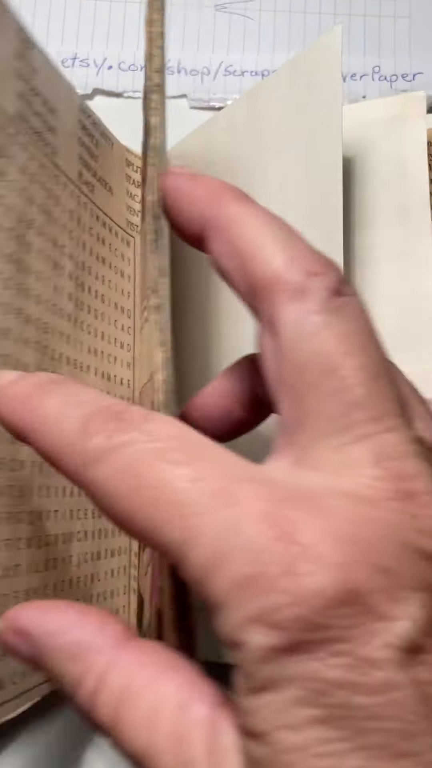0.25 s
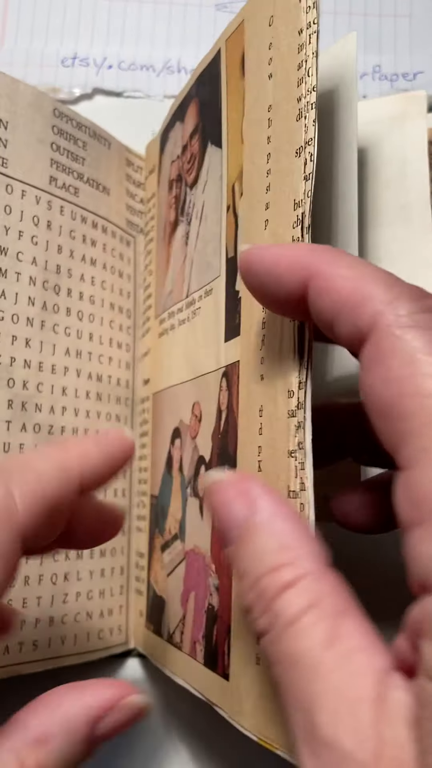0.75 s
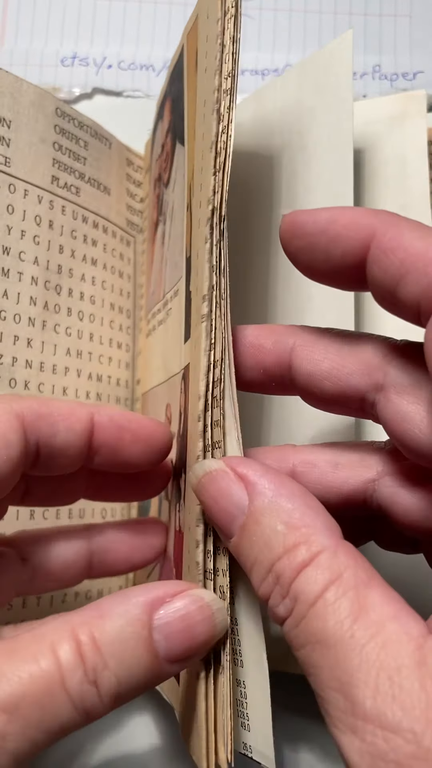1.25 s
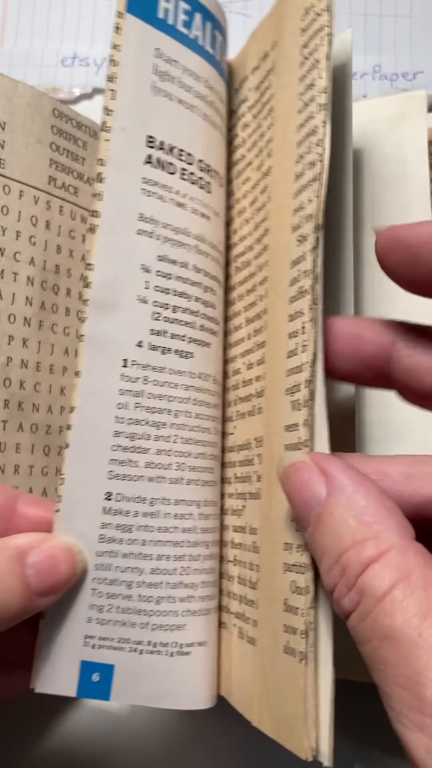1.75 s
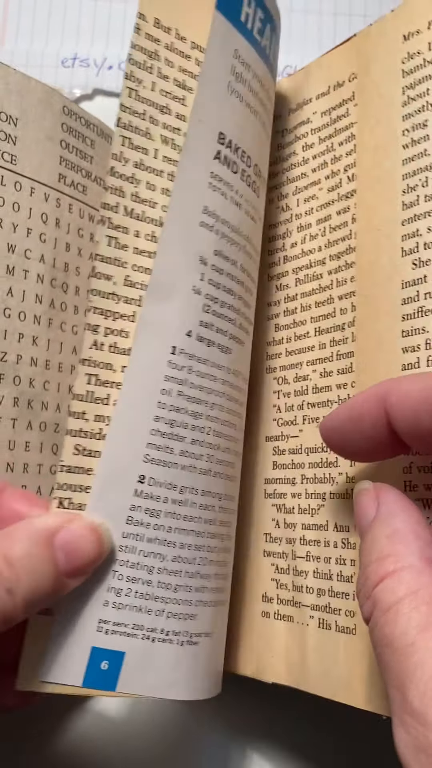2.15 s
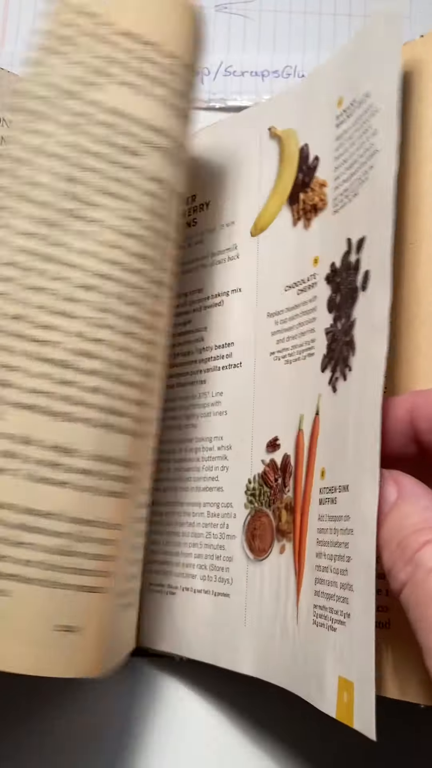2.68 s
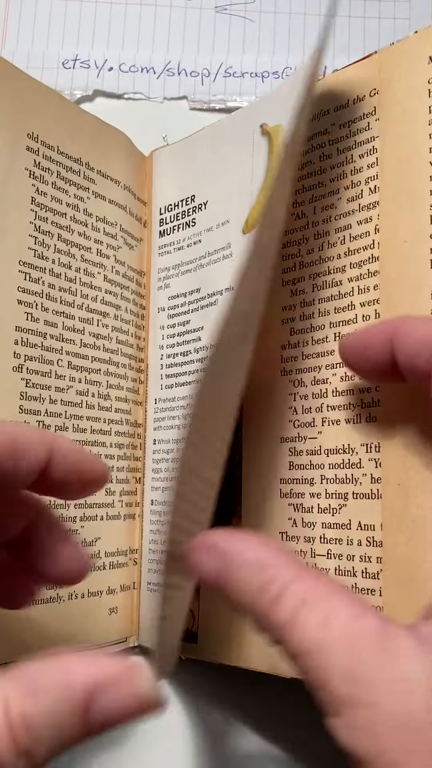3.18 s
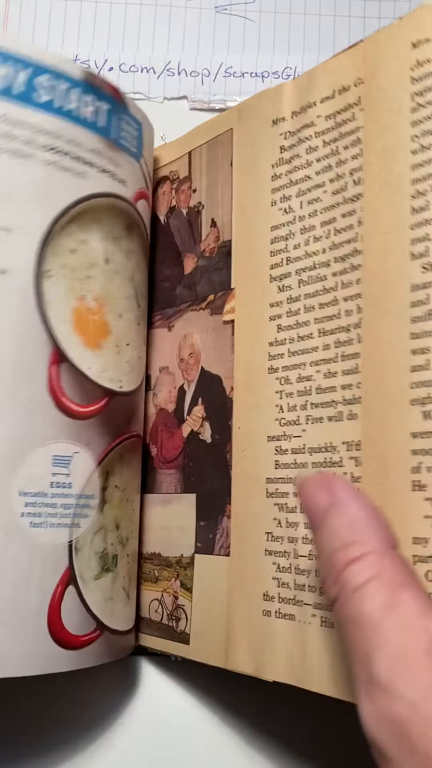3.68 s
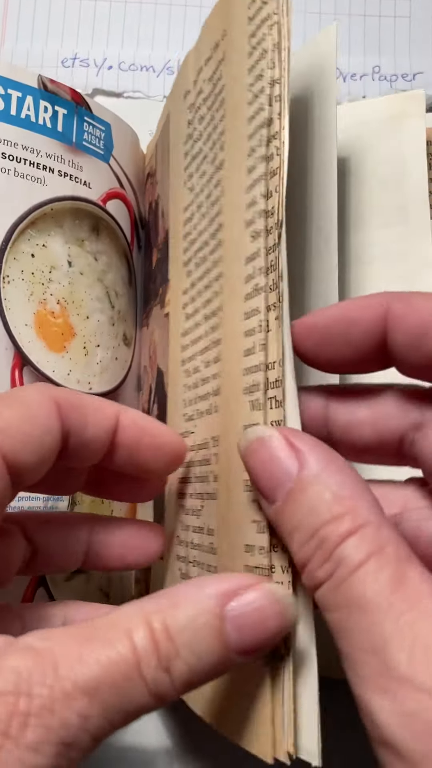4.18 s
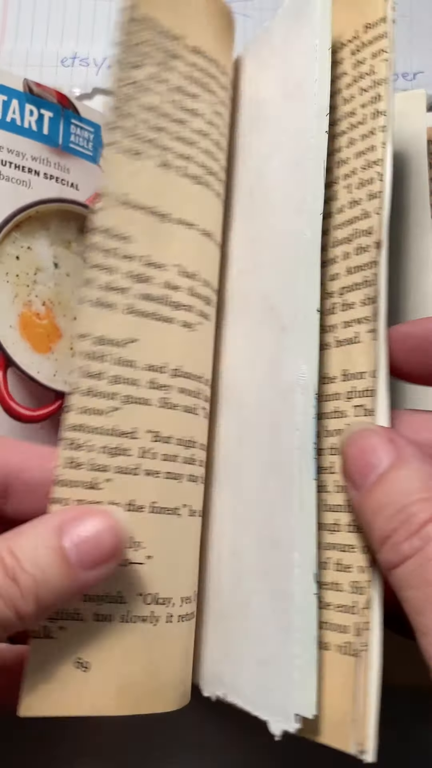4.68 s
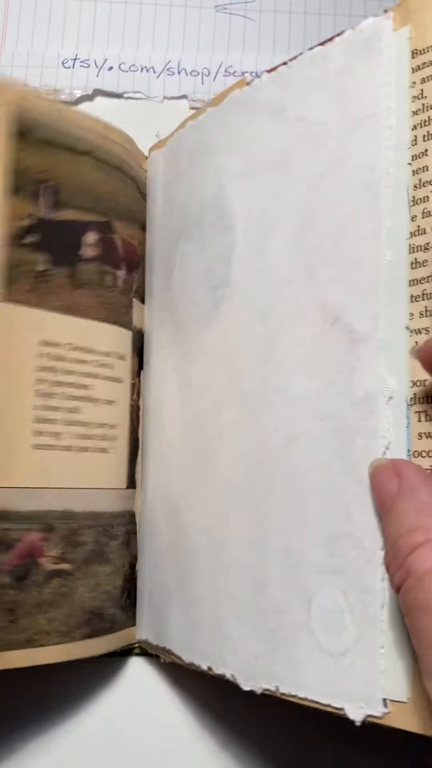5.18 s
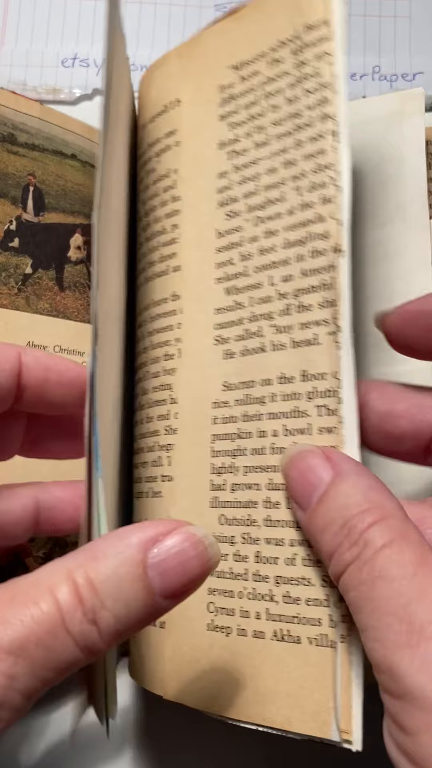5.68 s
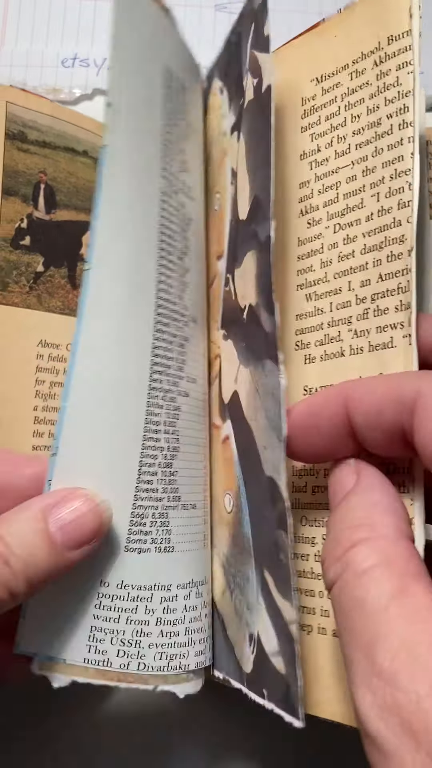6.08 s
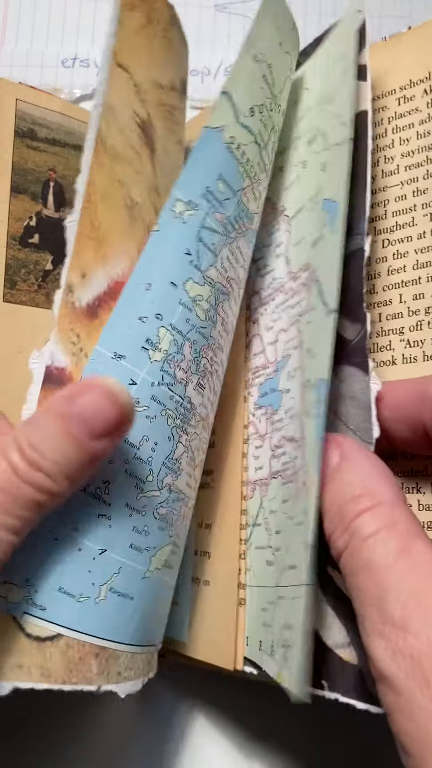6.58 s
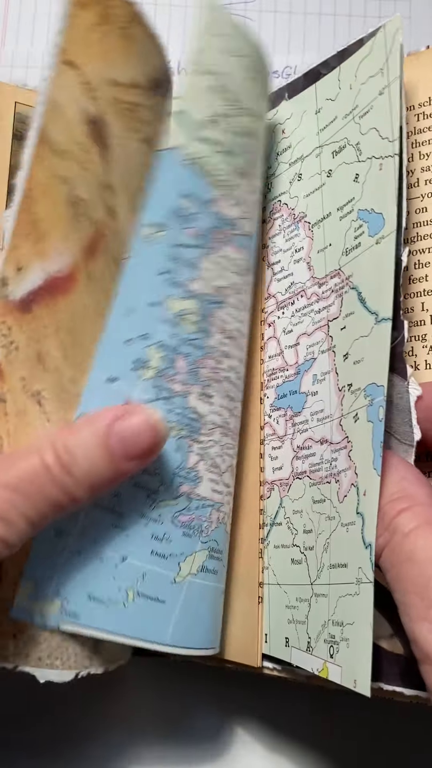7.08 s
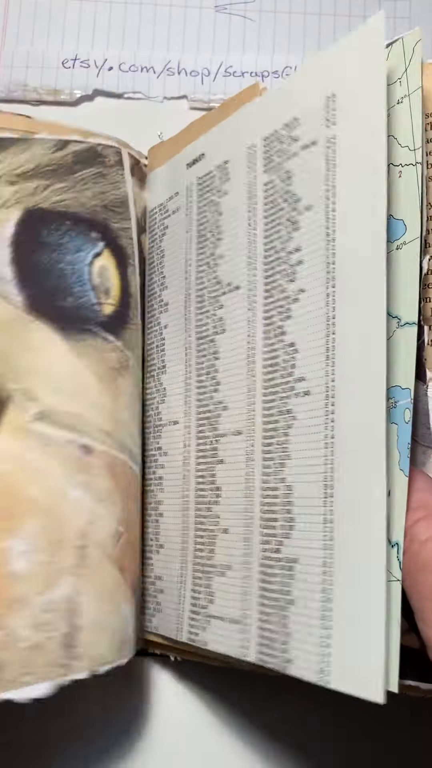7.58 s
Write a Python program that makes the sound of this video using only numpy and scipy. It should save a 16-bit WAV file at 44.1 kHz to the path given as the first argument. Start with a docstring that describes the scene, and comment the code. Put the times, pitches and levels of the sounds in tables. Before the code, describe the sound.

Close up in a quiet room, hands leaf through a small booklet of stiff mixed papers. The start is mostly faint finger brushing with small crease ticks; then pages flip with crisp crackling slaps and dull puffs of air. Later, two long grainy drags of a curled sheet dominate, ending in a cluster of crackly landings. Close stereo microphone, low soft room air.

```python
"""Fingers brush and slide over stiff mixed paper, close up in a quiet room, as hands leaf through a booklet.
Sliding is clumped hiss with sparse ticks, filtered by the sheet's edge, body and flap; creases snap in
short bursts; pages slap shut with a roll of crackle and a knock of air that falls in pitch.
Close echoes, a sparse room tail and low, faintly hissing air surround the book; a brief hum sags in pitch.
Two microphone ports hear it all with delay and shading between them."""
import sys
import numpy as np
from scipy import signal
from scipy.fft import rfft, irfft, next_fast_len
from scipy.io import wavfile
from scipy.ndimage import uniform_filter1d

SR = 44100
rng = np.random.default_rng(int(sys.argv[2]) if len(sys.argv) > 2 else 0)


def volts(x):
    """Linear amplitude factor 10**(x/20) for a level x in dB, scalar or array-like."""
    e = np.asarray(x, float) / 20
    return 10 ** e


def unload_audio(sound):
    """Save the sound as a 16-bit wav file, at the path given as the first command line argument."""
    columns = np.transpose(np.atleast_2d(sound))
    # keep every value between -1 and 1, then stretch to whole-number steps
    steps = np.round(np.clip(columns, -1, 1) * 32767)
    wavfile.write(sys.argv[1], SR, steps.astype(np.int16))


N = 346185
TIME_S = np.arange(N) / SR
FILTER_HZ = np.fft.rfftfreq(4096, 1 / SR)


def evened(x):
    """Scales to rms 1."""
    return x / np.sqrt(np.mean(x ** 2) + 1e-20)


def drift(x, samples):
    """Moving average of noise, rms 1: a slow random wander."""
    return evened(uniform_filter1d(x, samples))


def read(points, hz, order=1):
    """One column of a table on a log-frequency axis."""
    table = np.transpose(points)
    return np.interp(np.log(hz + 1), np.log(table[0] + 1), table[order])


def over_time(points):
    """Every column after the first, interpolated along time."""
    s, *columns = np.transpose(points)
    return [np.interp(TIME_S, s, column) for column in columns]


def causal(gain):
    """Minimum-phase response of energy 1 for a gain curve."""
    log_gain = np.log(np.maximum(np.r_[gain, gain[-2:0:-1]], 1e-5))
    taps = np.fft.ifft(np.exp(np.conj(signal.hilbert(log_gain)))).real[:1024]
    return taps / np.linalg.norm(taps)


def coloured(x, gain):
    """Filters both ports by a gain curve given on FILTER_HZ."""
    return signal.oaconvolve(x, causal(gain)[None], axes=1)[:, :N]


def resonate(x, hz, width_hz):
    """Shifts the curve hz down to zero, smooths, and shifts back: a moving resonance."""
    turn = np.exp(2j * np.pi * np.cumsum(hz) / SR)
    r = np.exp(-np.pi * width_hz / SR)
    return 2 * (turn * signal.lfilter([1 - r], [1, -r], x / turn)).real


def spread(apart_db):
    """Noise from a wide sheet: at lower pitches the two ports hear partly other parts of it."""
    # What only one port hears. Each row: frequency in Hz, level in dB re the common part before apart_db.
    apart = [(100, -2), (600, -5), (2000, -4), (4000, -7), (5200, -18), (9000, -14), (16000, -10)]
    common, *own = rng.standard_normal((3, N))
    own_gain = volts(read(apart, np.fft.rfftfreq(N, 1 / SR)) + apart_db)
    return common + irfft(rfft(own) * own_gain, N)


def bend():
    """Bending the sheet in hand moves its main resonance (Hz) and its low flap (dB re body)."""
    # The sheet in hand. Each row: time in seconds, main resonance in Hz, low flap in dB re body before trim.
    bends = [(0.0, 1420, 9), (0.239, 2300, -2), (0.33, 1530, 3.5), (0.46, 2050, 6), (1.621, 1740, 3),
             (2.23, 1180, 8), (2.8, 1290, 6.5), (2.93, 1530, 4), (3.24, 1900, -1.5), (3.34, 1530, 1.5),
             (3.62, 1680, 6.5), (4.02, 2150, 3), (4.2, 1360, 4.5), (4.26, 2660, -6), (4.35, 1330, 4.5),
             (4.46, 2220, -2), (4.61, 1410, 0), (5.03, 1564, 9.5), (5.25, 1650, 2), (5.46, 1300, 14.5),
             (5.49, 2550, 2), (5.55, 2470, -4), (5.61, 1630, 0.5), (5.86, 1900, 3.5), (5.9, 1550, -10),
             (6.19, 1226, 4), (6.27, 1300, 5.5), (6.31, 1800, 2.5), (6.41, 1870, -2.5), (6.56, 1950, 5),
             (6.6, 1400, 18), (6.68, 1500, -0.5), (6.87, 1290, 1), (6.96, 2030, 3), (7.07, 1980, 1),
             (7.12, 1430, 7.5), (7.34, 1310, 7.5), (7.56, 1660, 2), (7.65, 1760, 5), (7.85, 1730, 4.5)]
    return over_time(bends)


def paper(drive, edge_gain, body_gain, flap_gain, body_hz, sharp=0.94, width_hz=320, dull_hz=9000):
    """One excitation sounds through the sheet's edge, its body resonances and its slow flap."""
    # Edge colour. Each row: frequency in Hz, relative level in dB.
    edge = [(1800, -46.5), (3000, -12), (3900, -4), (5000, 5.5), (6500, 4), (8600, 6), (10500, 3),
            (12500, -1.5), (15500, -1)]
    # Fixed sheet resonances. Each row: frequency in Hz, half-width in Hz, relative level in dB.
    modes = [(962, 315, 11), (1300, 3900, -13), (1940, 256, -5), (2665, 230, -6.5), (4040, 640, -3)]
    # Flap colour. Each row: frequency in Hz, relative level in dB.
    flap = [(60, -53), (130, -17.5), (250, -6.5), (420, -2.5), (700, 5.5), (950, 8.5), (1400, -21)]
    # Second resonance of the bent sheet, below the main one on a tightly curled page.
    # Each row: time in seconds, ratio to the main resonance, share of the main resonance (1 = equal).
    second = [(0, 2.03, 0.11), (1.68, 1.3, .2), (1.72, 0.67, 0.44), (1.8, 1.4, .8), (2.02, 1.4, 0.32),
              (6.8, 2.5, 0.6), (6.9, 0.71, 0.86), (7.07, 0.61, 1.2), (7.14, 2.6, 0.22)]
    hz = FILTER_HZ
    ring = sum(volts(db) / (1 + ((hz - f) / w) ** 2) for f, w, db in modes)
    ring = ring * (hz / (hz + 600)) ** 4 / (1 + (hz / dull_hz) ** 4)
    ratio, share = over_time(second)
    body = drive * body_gain
    main = resonate(body, body_hz, width_hz)
    other = resonate(body, ratio * body_hz, 0.5 * width_hz)
    bent = 0.5 * body + sharp * (main + share * other)
    return (coloured(drive * edge_gain, volts(read(edge, hz))) + coloured(bent, ring)
            + coloured(drive * flap_gain, volts(read(flap, hz))))


def contact():
    """Edge hiss and sheet body in dB: touch, drags and rubs add up in power."""
    # Fingers resting and creeping on the pages.
    # Each row: time in seconds, edge hiss in dB before trim, sheet body in dB re hiss before trim.
    touch = [(0, -54.5, -14), (.12, -60.5, -5.5), (.3, -71, -25), (.42, -85.5, -9), (.58, -69, -18),
             (.66, -79.5, -13), (.9, -68, -17), (1.17, -90, -2.5), (1.3, -70.5, -14), (1.45, -79, -3),
             (1.56, -68.5, 7.5), (1.7, -76.5, 11), (1.8, -74.5, -26), (2.0, -79.5, -2), (2.22, -65.5, 5.5),
             (2.36, -88, -9.5), (2.6, -72.5, -7.5), (2.85, -59.5, -4.5), (3.04, -79.5, -1.5),
             (3.14, -85, 12), (3.36, -80.5, 4), (3.4, -57, -12), (3.5, -63, 7.5), (3.56, -104, -5),
             (3.69, -71, -21), (3.77, -91, -20), (3.95, -70.5, -15), (4.2, -101, -2.5), (4.35, -67, -2.5),
             (4.42, -76.5, -6), (4.5, -62.5, -8.5), (4.9, -74.5, 4.5), (5.06, -76.5, -12),
             (5.34, -69.5, -1.5), (5.7, -83, -3.5), (5.87, -69, 0.5), (6.07, -60, -3), (6.78, -100, -21),
             (7.44, -62.5, 5.5), (7.78, -66, -4), (7.85, -80, 12)]
    # Two long drags of a curled page, one list each.
    # Each row: time in seconds, edge hiss in dB before trim, sheet body in dB re hiss before trim.
    drags = [
        [(6.12, -87, -17), (6.132, -68, 1), (6.186, -46, -0.5), (6.244, -49.5, 3), (6.334, -45, 0.5),
         (6.354, -50, 4), (6.364, -44, -5.5), (6.4, -42, -1.5), (6.52, -54, 1.5), (6.54, -44.5, 2),
         (6.56, -45, -5.5), (6.567, -58.5, 4), (6.6, -69, -5)],
        [(6.78, -59.5, -4), (6.84, -54, -2.5), (6.88, -46, 0.5), (6.96, -42.5, 0), (6.996, -48.5, 6),
         (7.062, -41, -1), (7.108, -50.5, -2), (7.145, -43, 5), (7.16, -46, -4.5), (7.272, -50.5, -4.5),
         (7.338, -44, -1), (7.362, -50.5, -9), (7.37, -59, 0), (7.4, -64, -14)],
    ]
    # Quick rubs of sheet on sheet. Each row: loudest time in seconds, rise in seconds, fall in seconds,
    # edge hiss in dB before trim, sheet body in dB re hiss before trim.
    rubs = [(.04, 0.028, 0.047, -67, 8.5), (0.293, 0.039, 0.052, -65, 2),
            (0.702, 0.018, 0.0072, -55.5, -36), (.73, 0.066, 0.23, -67.5, -13),
            (0.967, 0.042, 0.0096, -57, -17), (1.07, 0.015, 0.034, -69.5, -29),
            (1.214, 0.021, 0.06, -58.5, -21.5), (1.40, 0.056, 0.043, -64, -2),
            (1.519, 0.018, 0.014, -47, -12.5), (1.575, 0.02, 0.059, -50.5, -12),
            (1.614, 0.082, 0.018, -50.5, -5), (1.68, 0.076, 0.017, -73.5, 10.5),
            (1.716, 0.011, 0.05, -57.5, 4.5), (1.745, 0.041, 0.011, -60, 6.5), (1.92, 0.12, 0.022, -76, 5),
            (2.097, 0.036, 0.026, -69, 10), (2.122, 0.026, 0.053, -33.5, -9.5),
            (2.172, 0.03, 0.019, -38.5, -9.5), (2.254, 0.012, 0.01, -49, 6.5),
            (2.278, 0.044, 0.051, -66.5, 2.5), (2.47, 0.077, 0.083, -62.5, 0.5),
            (2.762, 0.041, 0.07, -50.5, -9.5), (2.918, 0.022, 0.021, -56, 1),
            (3.181, 0.059, 0.071, -59, -2), (3.237, 0.04, 0.039, -50, 3.5), (3.42, 0.032, 0.11, -63, -6),
            (3.503, 0.074, 0.011, -54, -7), (3.619, 0.049, 0.26, -59.5, 0),
            (3.846, 0.045, 0.069, -50.5, 0.5), (4.172, 0.055, 0.042, -71.5, -1),
            (4.25, 0.023, 0.063, -62, -16), (4.635, 0.052, 0.032, -52, -6.5), (4.81, 0.048, 0.054, -50, -1),
            (4.856, 0.09, 0.011, -60.5, 11), (4.971, 0.015, 0.026, -53.5, 1),
            (5.079, 0.0099, 0.046, -54, 7.5), (5.147, 0.022, 0.054, -41, -5.5),
            (5.239, 0.21, 0.06, -57.5, 0), (5.52, 0.068, 0.1, -61, -8), (5.567, 0.057, 0.1, -58.5, 0),
            (5.784, 0.024, 0.049, -46, -11), (5.96, 0.031, 0.04, -68.5, 7.5), (6.63, 0.09, 0.25, -60, 3),
            (6.714, 0.068, 0.056, -42.5, -3.5), (7.511, 0.089, 0.21, -50, 0.5),
            (7.6, 0.046, 0.21, -58.5, -17), (7.657, 0.066, 0.098, -47, -5.5), (7.698, 0.029, 0.036, -47, 2),
            (7.727, 0.022, 0.012, -53.5, -9), (7.81, 0.035, 0.016, -47, -3)]
    rub_drop_db = 20  # sunk by this much one rise or fall time from the top
    rise_round, fall_round = 1.56, 1.36  # 1 = pointed top, more = round top and sudden end
    t, power = np.arange(0, N + 64, 32) / SR, 0
    for s, db, body in map(np.transpose, [touch, *drags]):
        last_db = db[-1] if s[0] == 0 else -150  # touch holds on, drags fall silent
        db = np.interp(t, s, db, left=-150, right=last_db)
        power = power + volts([db, db + np.interp(t, s, body)]) ** 2
    for s, rise, fall, db, body in rubs:
        away = abs(t - s) / np.maximum(np.where(t < s, rise, fall), .003)
        hiss = db - rub_drop_db * away ** np.where(t < s, rise_round, fall_round)
        power = power + volts(hiss + np.array([[0], [body]])) ** 2
    return [np.interp(TIME_S, t, 10 * np.log10(p)) for p in power]


def friction():
    """Fibres catch and slip: hiss in clumps with sparse stronger ticks, in drifting patches of colour."""
    tick_rate_hz, tick_gain = 450, 2.53
    loose = spread(apart_db=0)
    quick, slow, draw = rng.standard_normal((3, N))
    clumps_db = 1.8 * drift(quick, 50) + 0.9 * drift(slow, 500)
    tick_size = volts(1.4 * np.minimum(rng.exponential(1, N), 4))
    ticks = tick_size * np.sign(draw) * (rng.random(N) < tick_rate_hz / SR)
    z = signal.stft(volts(clumps_db) * (loose + tick_gain * ticks), nperseg=256)[2]
    patches = rng.standard_normal((z.shape[2], z.shape[1])).T  # frequency by time
    patches_db = 1.92 * drift(uniform_filter1d(patches, 5, 0), 12)
    patches_db += 1.31 * drift(uniform_filter1d(patches, 12, 0), 40)
    return evened(signal.istft(z * volts(patches_db), nperseg=256)[1][:, :N])


def slides():
    """Friction at the contact level drives the sheet, with a direct brush of fingertips on paper."""
    # Fingertips brushing paper. Each row: frequency in Hz, relative level in dB.
    skin = [(8000, -45), (11500, 22), (13500, -8.5), (16000, 5)]
    edge_db, body_db, flap_db = 5, 3, -11
    hiss, body = contact()
    body_hz, flap = bend()
    body_hz = body_hz * volts(0.4 * drift(rng.standard_normal(N), 2500))  # the bend never holds still
    drive = friction()
    brush = drive * volts(0.8 * hiss - 15)  # a light touch is relatively brighter than a hard one
    brush = coloured(brush, volts(read(skin, FILTER_HZ)))
    levels = volts(hiss + edge_db), volts(body + body_db), volts(body + flap + flap_db)
    return brush + paper(drive, *levels, body_hz)


def page_echoes(x):
    """Facing pages throw back a few close echoes that comb the sliding sound."""
    taps = np.zeros(300)
    taps[rng.integers(30, 300, 6)] = volts(-16) * rng.choice([-1., 1.], 6)
    taps[0] = 1
    return signal.oaconvolve(x, taps[None] / np.linalg.norm(taps), axes=1)[:, :N]


def air():
    """Low rumble of the building and faint hiss, slowly wavering."""
    # Still room air. Each row: frequency in Hz, relative level in dB per Hz.
    air_curve = [(25, -1.5), (70, 5.5), (130, -4), (300, -15), (500, -24.5), (1200, -38), (3000, -33),
                 (6000, -54), (9000, -48), (15500, -22.5)]
    level_db = -72.5
    waver_db = 1.7 * drift(rng.standard_normal(N), 6000)
    z = rfft(spread(apart_db=1.5)) * volts(read(air_curve, np.fft.rfftfreq(N, 1 / SR)))
    return volts(level_db + waver_db) * evened(irfft(z, N))


def bursts(times_s, lengths_s, gains, click, steep, trail, rise_s):
    """A click, then crackle that stops short, then a faint trail; returns the drive and its levels."""
    levels, t = np.zeros((len(gains[0]), N + 4000)), np.arange(4000) / SR
    drive = spread(apart_db=-6.0) * volts(1.86 * drift(rng.standard_normal(N), 40))
    onset = np.minimum((t + 0.00007) / max(rise_s, .0002), 1)
    for s, length_s, gain in zip(times_s, lengths_s, gains):
        at = round(s * SR)
        crackle = np.exp(-(t / max(length_s, .0005)) ** steep)
        levels[:, at:at + 4000] += gain[:, None] * (crackle + trail * np.exp(-t / 0.019)) * onset
        drive[:, at + 2] = click
    return drive, levels[:, :N]


def knocks(times_s, push_db):
    """Air squeezed from the gap rings in a few decaying tones that fall in pitch."""
    # Tones of a knock. Each row: start in Hz, end in Hz, relative level in dB, t60 in seconds.
    tones = [(776, 68.8, 5.5, 0.097), (377, 91, -29.5, 0.2), (119, 43, -6.5, 0.16)]
    knock_db, droop_s = 8, 0.00369  # trim; time constant of the fall in pitch
    blows, t = np.zeros(N), np.arange(6000) / SR
    blows[np.round(times_s * SR).astype(int)] = volts(push_db + knock_db)
    fall = droop_s * (1 - np.exp(-t / droop_s))
    ring = sum(volts(db - 60 * t / t60) * np.sin(2 * np.pi * (low * t + (high - low) * fall))
               for high, low, db, t60 in tones)
    return signal.oaconvolve(blows, ring)[:N]


def slaps():
    """A page lands flat: a short roll of crackle and a dull knock of air."""
    # Pages landing. Each row: time in seconds, edge level in dB before trim,
    # sheet body in dB re edge before trim, push of air in dB before trim, crackle length in seconds.
    landings = [(0.024, -42.5, 3, -65.5, 0.01), (1.508, -41, 6, -72.5, 0.0025),
                (1.8643, -34, 3, -59.5, 0.012), (2.2661, -27.5, 2, -51, 0.0067),
                (2.452, -47.5, -8, -69, 0.0057), (2.911, -36, -2, -67, 0.0034),
                (3.217, -29.5, -8, -78.5, 0.0098), (3.483, -49, 11, -69.5, 0.017),
                (3.509, -67, 3, -69, 0.0064), (4.572, -54, 16, -72, 0.0068),
                (4.707, -35.5, 1.5, -64, 0.0078), (4.934, -60, 12, -67, 0.016),
                (4.965, -24.5, -3, -60, 0.0086), (5.079, -24, -5, -63.5, 0.01),
                (5.092, -35, 4.5, -63, 0.0042), (5.207, -47.5, 17.5, -61.5, 0.0088),
                (7.648, -38, 18.5, -65, 0.0073), (7.66, -43, 14, -60, 0.0036), (7.692, -38, 16, -63, 0.011),
                (7.702, -42, 11.5, -62, 0.0015), (7.722, -49, 11, -61, 0.02)]
    edge_db, body_db, flap_db = -7, -10.0, 11.0
    s, db, body, push, length_s = np.transpose(landings)
    gains = volts(np.array([db + edge_db, db + body + body_db, push + flap_db]).T)
    trail = np.array([[.03], [.05], [.18]])  # edge, body, flap
    drive, levels = bursts(s, length_s, gains, click=2.0, steep=2.04, trail=trail, rise_s=0.00034)
    sheet = paper(drive, *levels, bend()[0], sharp=0.4, width_hz=510, dull_hz=2720)
    return sheet + knocks(s, push)


def snaps():
    """A crease pops through and the sheet rings briefly at the pitch of its bend."""
    # Creases popping. Each row: time in seconds, edge level in dB before trim,
    # sheet body in dB re edge before trim, crackle length in seconds (at least 0.0005 is used).
    creases = [(0.034, -48, 3, 0.0048), (0.1008, -28, -14.5, 0.0013), (0.202, -44.5, -35, 0.0027),
               (1.031, -56, -12, 0.004), (1.21, -47, -29, 0.0014), (1.265, -39, -12, 0.0034),
               (1.477, -48, -23, 0.0056), (1.4877, -36, -13, 0.0044), (1.72, -51, -18, 0.0045),
               (1.923, -45, -8.5, 0.0031), (2.211, -42.5, -3.5, 0.003), (2.403, -59.5, 3, 0.0092),
               (2.467, -41, -10, 0.0033), (2.601, -57, 2.5, 0.0052), (2.697, -53, 9.5, 0.0077),
               (2.746, -59, 9, 0.0068), (2.814, -55, 13, 0.0033), (3.008, -59.5, -0.5, 0.0053),
               (3.2503, -38, -1, 0.0082), (3.289, -41.5, -0.5, 0.0041), (3.6172, -46.5, 17.5, 0.004),
               (3.7084, -52.5, 3, 0.005), (3.7992, -39.5, -6, 0.016), (4.059, -61, -4.5, 0.039),
               (4.099, -47.5, -7, 0.0027), (4.758, -45, -6, 0.02), (5.267, -71.5, -8, 0.0024),
               (5.321, -59, 9.5, 0.007), (5.374, -55.5, 0, 0.0028), (5.456, -66, 7, 0.0034),
               (5.5494, -38, -12, 0.0057), (5.558, -41.5, -2, 0.0096), (5.927, -44, -5, 0.011),
               (6.037, -45, -3, 0.00079), (6.065, -44.5, 4, 0.0025), (6.374, -30, -10, 0.001),
               (6.6095, -34.5, -12, 0.0012), (7.2503, -49.5, 12, 0.004), (7.276, -48, 13, 0.002),
               (7.3, -44, 8.5, 0.0066), (7.322, -46, -1, 0.0042), (7.34, -37.5, 4, 0.0033),
               (7.444, -52.5, 15.5, 0.0072), (7.762, -36, -7, 0.0035)]
    edge_db, body_db, flap_db = -5, -6.0, -16
    s, db, body, length_s = np.transpose(creases)
    gains = volts(np.array([db + edge_db, db + body + body_db, db + body + flap_db]).T)
    drive, levels = bursts(s, length_s, gains, click=11., steep=1.1, trail=.03, rise_s=.0002)
    return paper(drive, *levels, bend()[0], sharp=1.37, width_hz=274, dull_hz=3900)


def room(x):
    """Sparse reflections from desk and walls, other ones at each port, each band dying at its own speed."""
    # Room tail. Each row: frequency in Hz, level in dB, t60 in seconds.
    tail_bands = [(102, -9, 0.24), (493, -20, 0.11), (2000, -18, 0.26), (4000, -15.5, 0.24),
                  (7400, -29, 0.027), (15000, -33, 0.045)]
    taps = np.zeros((2, SR // 2))
    at = np.arange(60, SR // 2 - 20, 20)
    at = at + rng.integers(0, 20, (2, len(at)))
    np.put_along_axis(taps, at, rng.choice([-1., 1.], at.shape), 1)
    hz, t, z = signal.stft(taps, SR, nperseg=256)
    t60 = np.maximum(read(tail_bands, hz, order=2), .01)
    fade = volts(-60 * t / t60[:, None])
    fade *= volts(read(tail_bands, hz))[:, None] / np.linalg.norm(fade, axis=1, keepdims=True)
    tail = signal.istft(z * fade, SR, nperseg=256)[1] * np.sqrt(20 / 128)  # tap spacing over hop
    return signal.fftconvolve(x[None], tail, axes=1)[:, :N]


def hum():
    """A faint low hum with its third partial, noise through narrow resonances, sags in pitch."""
    # In order: start in seconds, end in seconds, start in Hz, end in Hz.
    start_s, end_s, high_hz, low_hz = (.87, 1.03, 262, 240)
    swell = np.sin(np.pi * np.clip((TIME_S - start_s) / (end_s - start_s), 0, 1))
    hz = np.interp(TIME_S, [start_s, end_s], [high_hz, low_hz])
    noise = rng.standard_normal(N)
    tone = evened(resonate(noise, hz, width_hz=8.4))
    third = evened(resonate(noise, 3 * hz, width_hz=25))
    return volts(-74.0) * swell * (tone + 0.3 * third)


def scene():
    """The book, its reflections, the room air and the hum."""
    book = page_echoes(slides()) + slaps() + snaps()
    return book + room(book.mean(0)) + air() + hum()


def low_pass(x):
    """Removes everything above the highest recorded frequency."""
    return signal.sosfilt(signal.butter(12, 16820, fs=SR, output="sos"), x)


def record(dry):
    """Each port has its own delay and shading by frequency; bass roll-off and band limit follow."""
    # Port pair. Each row: frequency in Hz, phase lead of left in radians, left minus right in dB.
    port_pair = [(60, -.4, -1.5), (300, -.6, -1.5), (600, -.9, -.5), (1000, -1.4, -7), (1700, .3, -9),
                 (2400, .9, -6), (3500, 1.3, -4), (4500, 2.3, -2.5), (5400, 3.2, -.5), (7000, 4.7, 0),
                 (8600, 6.3, 0), (11700, 9.4, 0), (14900, 12.6, 0), (17000, 12.7, 0)]
    bass_hz, limit_hz = 35, 15850
    size = next_fast_len(N + 512)
    hz = np.fft.rfftfreq(size, 1 / SR)
    half = volts(read(port_pair, hz, order=2) / 2) * np.exp(.5j * read(port_pair, hz))
    bass = hz ** 2 / (hz ** 2 + bass_hz ** 2)
    limit = 0.0022 + 1 / (1 + np.exp(np.clip((hz - limit_hz) / 40, -50, 50)))  # slight leak above
    ports = irfft(rfft(dry, size) * bass * limit * np.array([half, 1 / half]), size)[:, :N]
    return low_pass(ports)


dry = scene()
out = record(dry)
unload_audio(out)
```